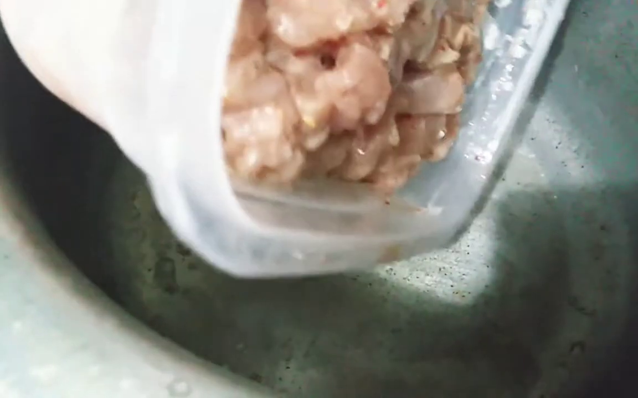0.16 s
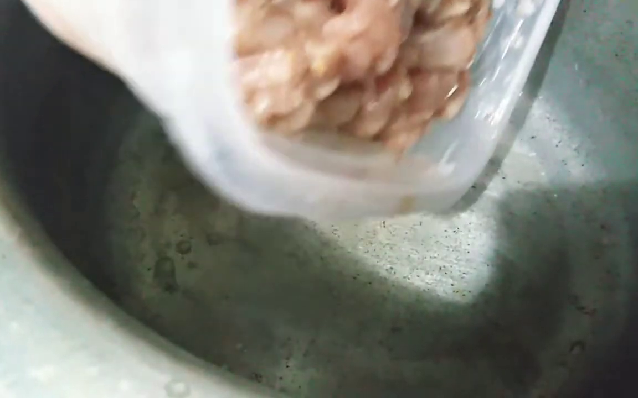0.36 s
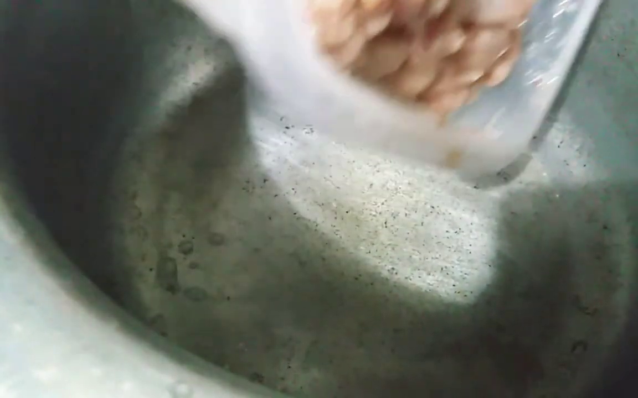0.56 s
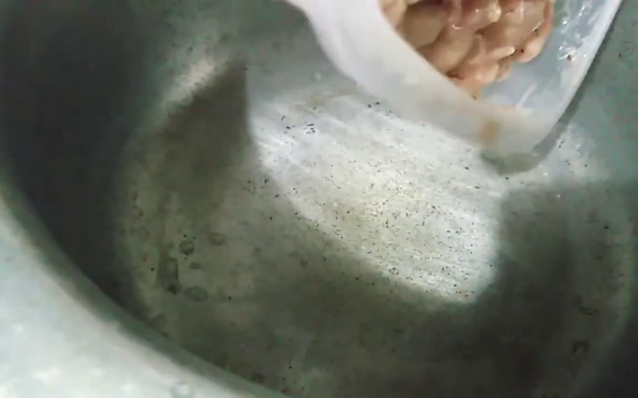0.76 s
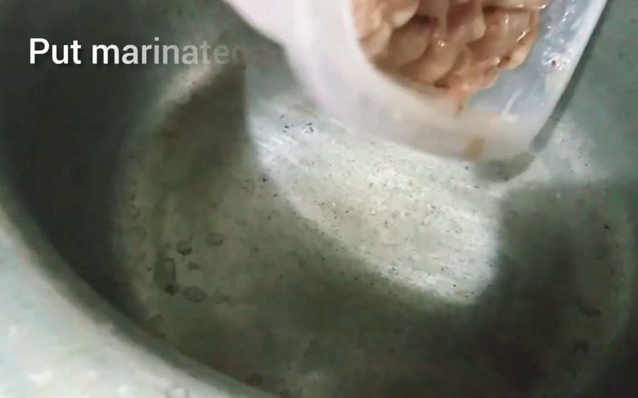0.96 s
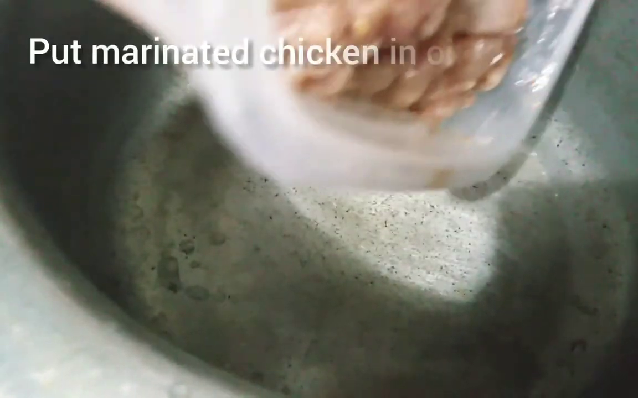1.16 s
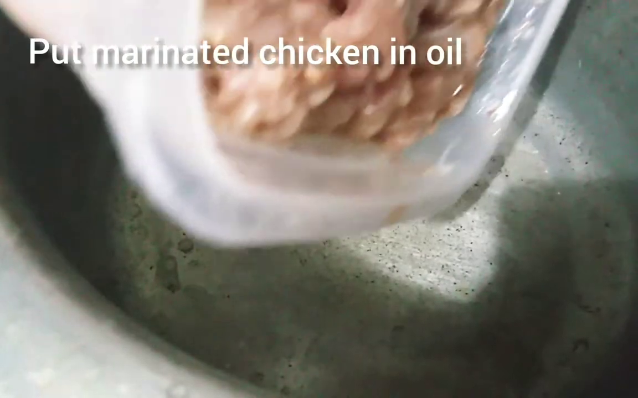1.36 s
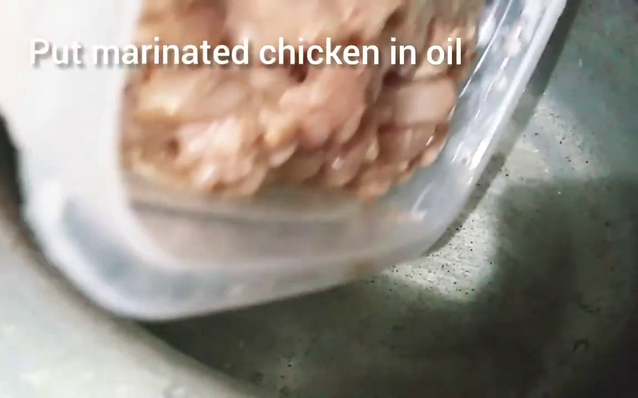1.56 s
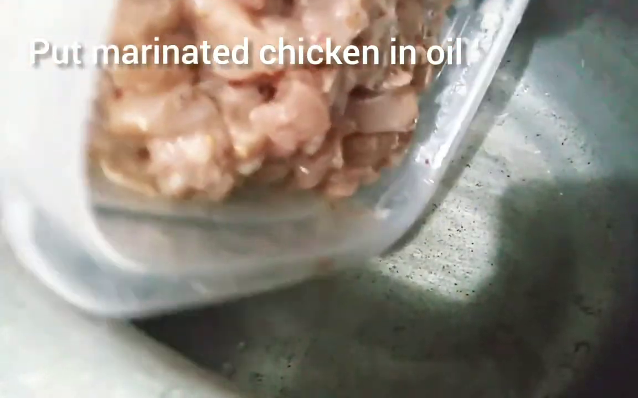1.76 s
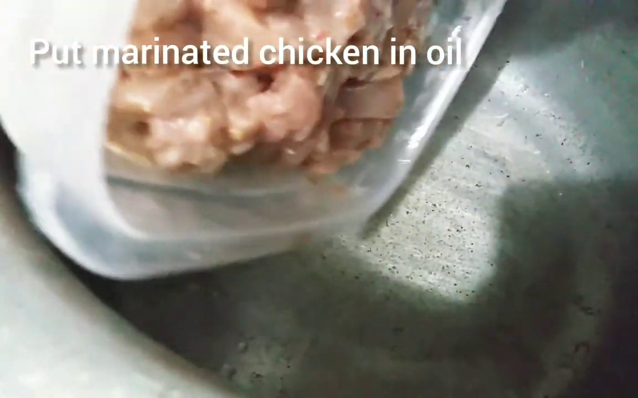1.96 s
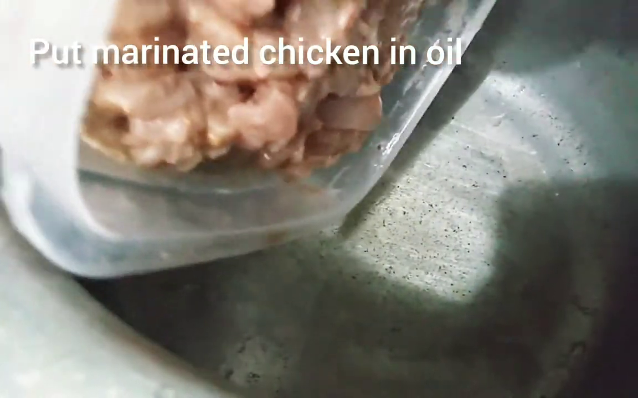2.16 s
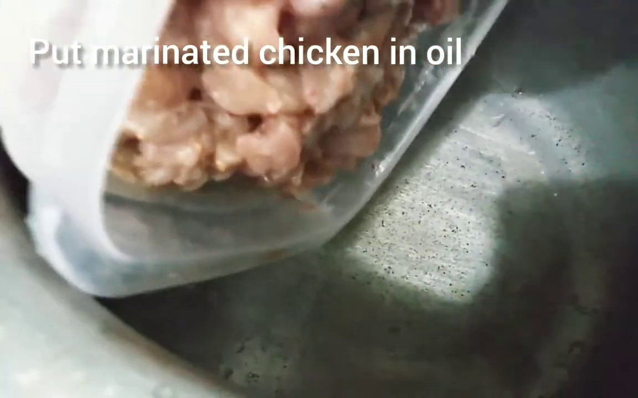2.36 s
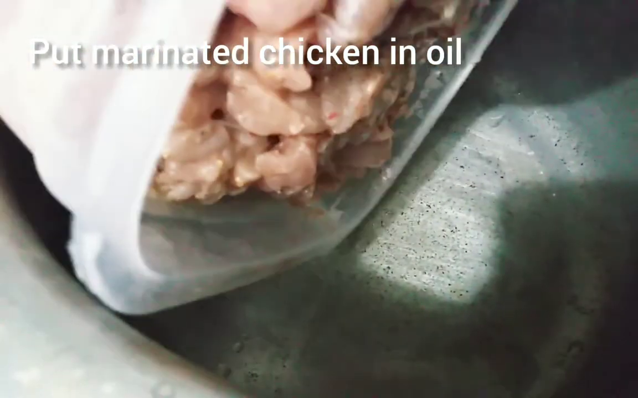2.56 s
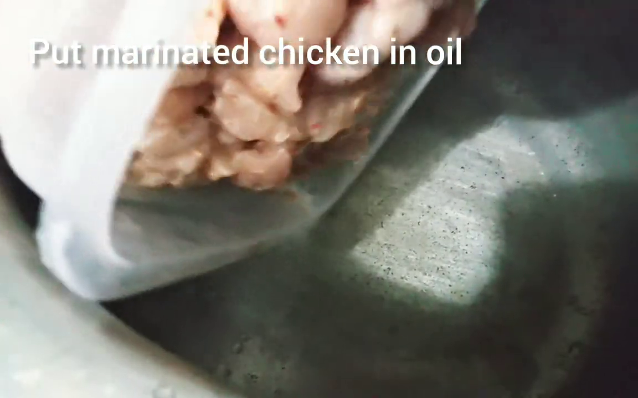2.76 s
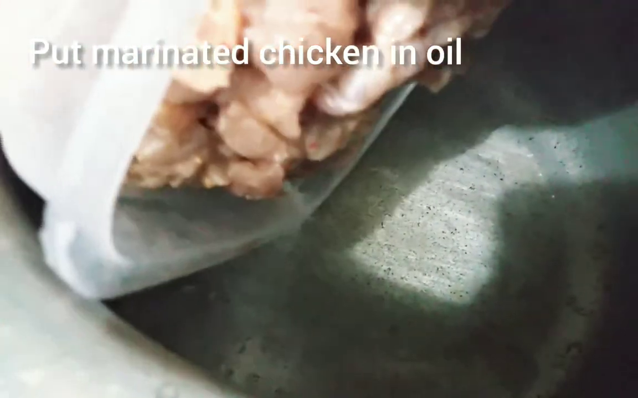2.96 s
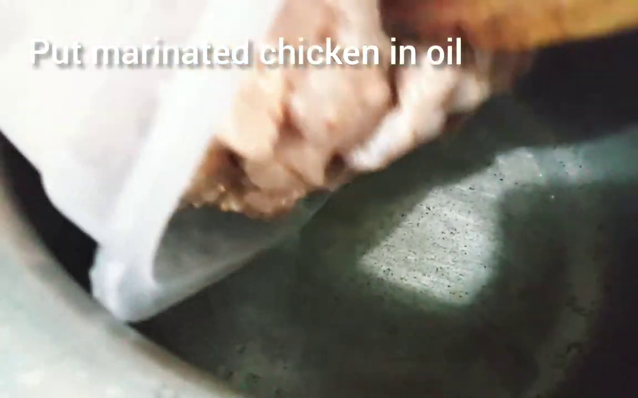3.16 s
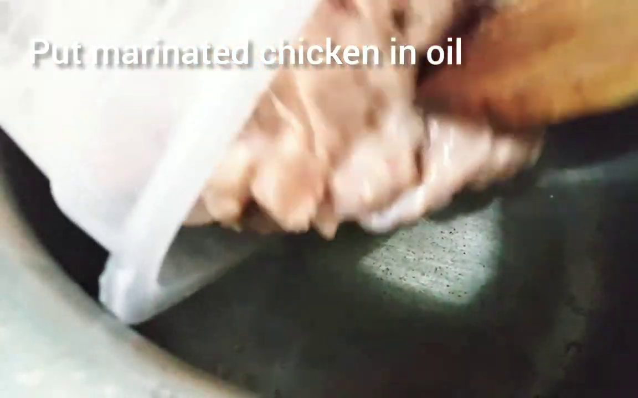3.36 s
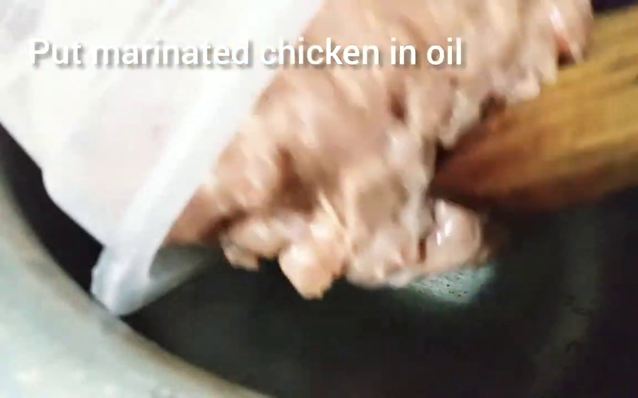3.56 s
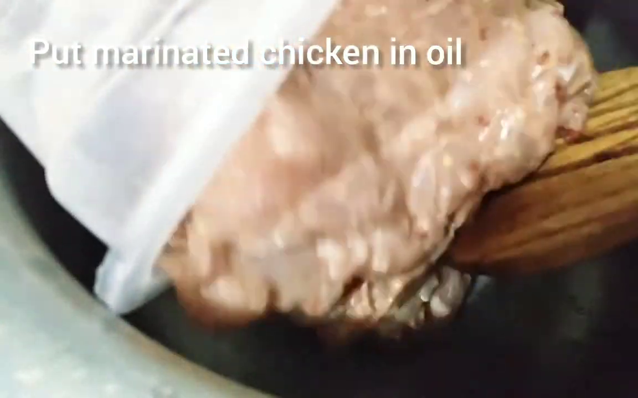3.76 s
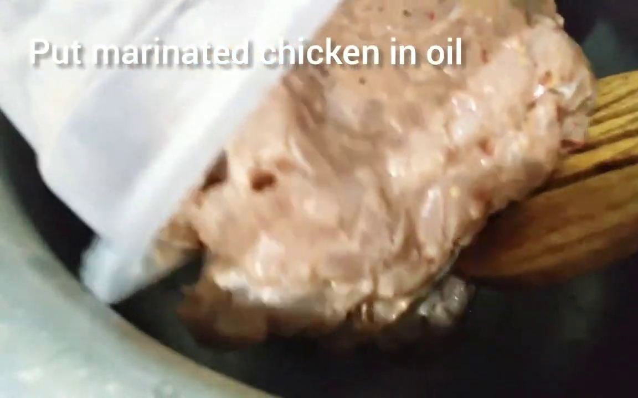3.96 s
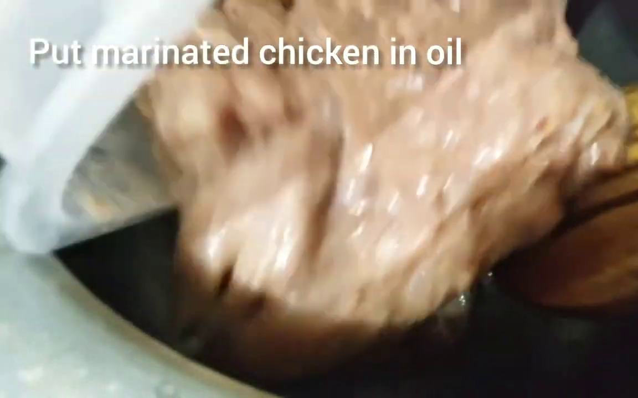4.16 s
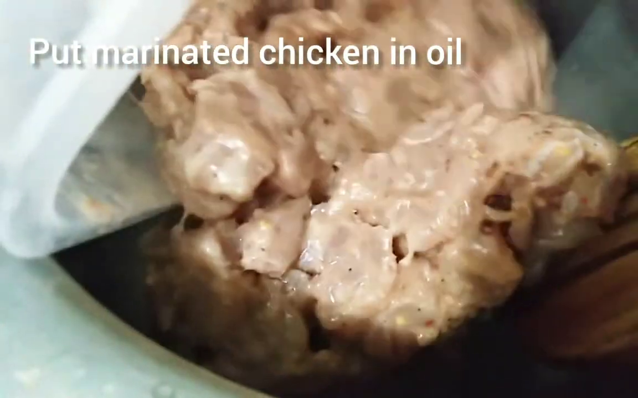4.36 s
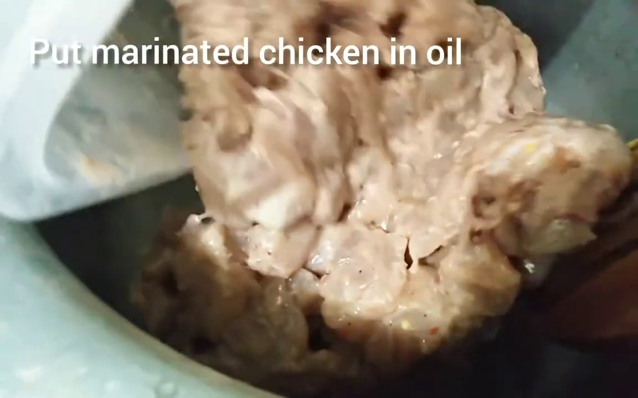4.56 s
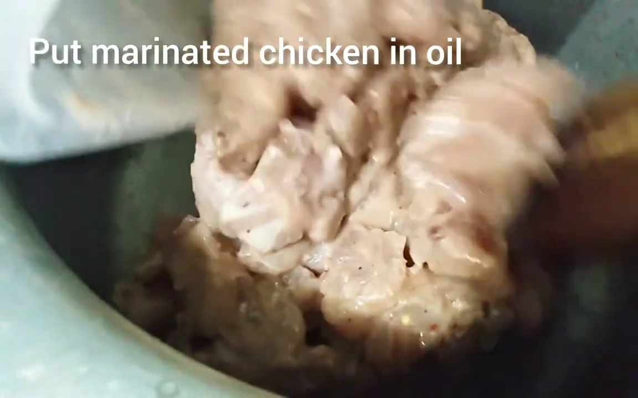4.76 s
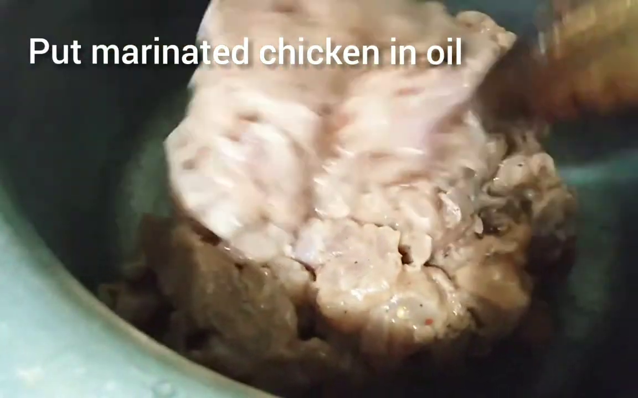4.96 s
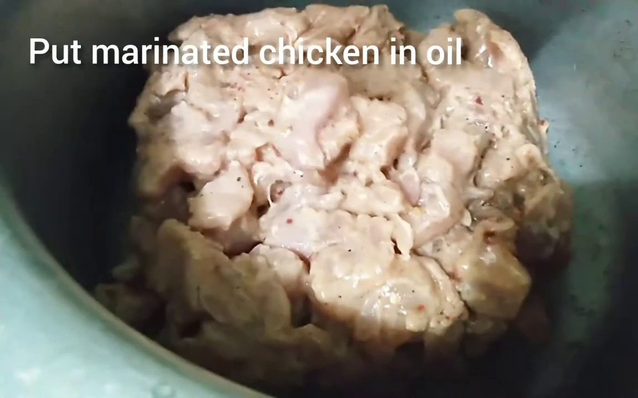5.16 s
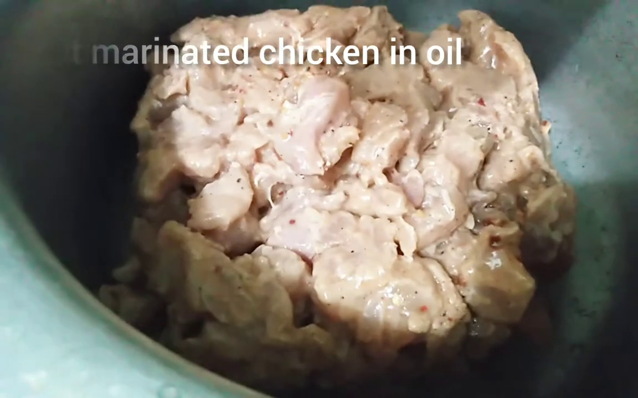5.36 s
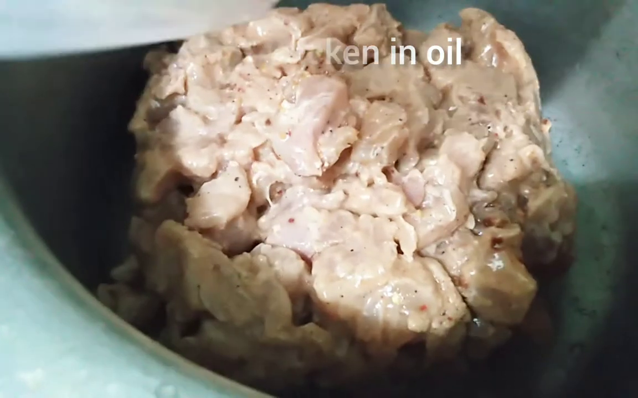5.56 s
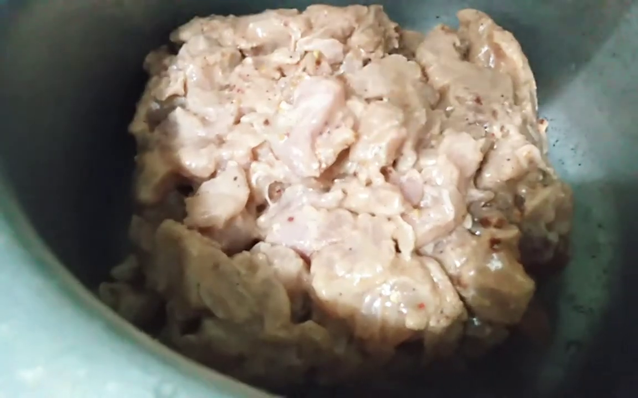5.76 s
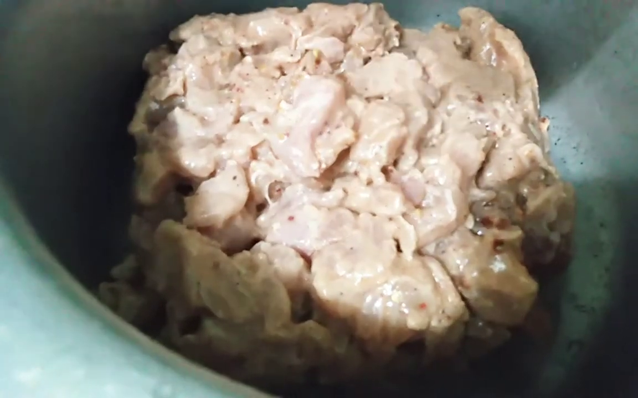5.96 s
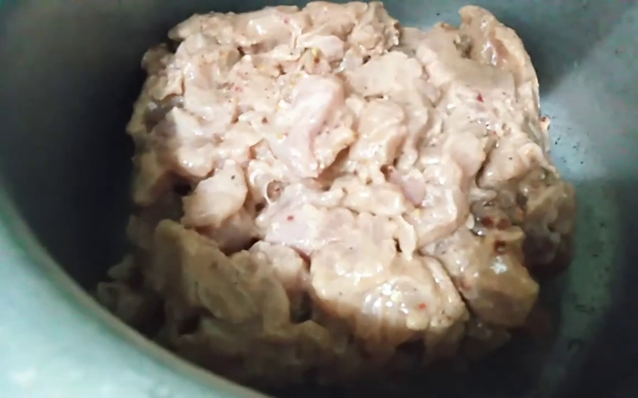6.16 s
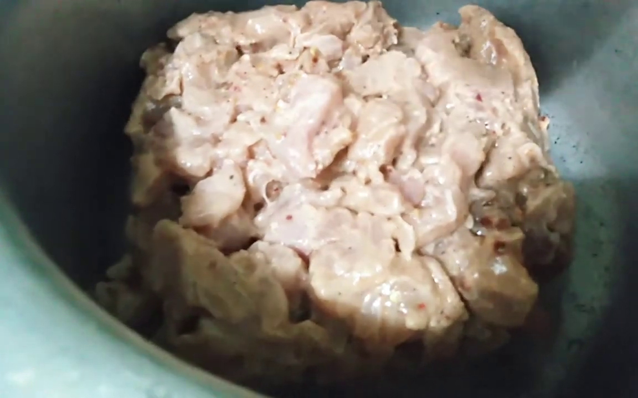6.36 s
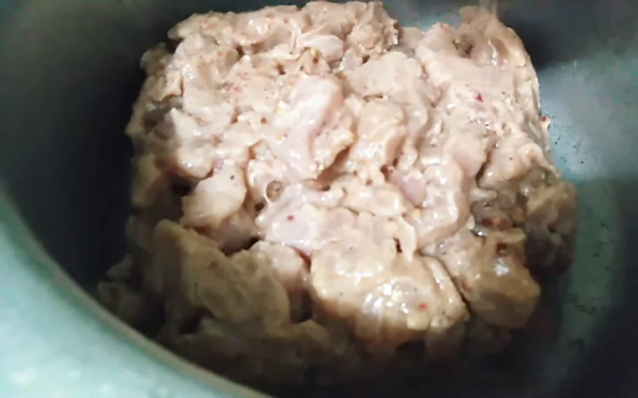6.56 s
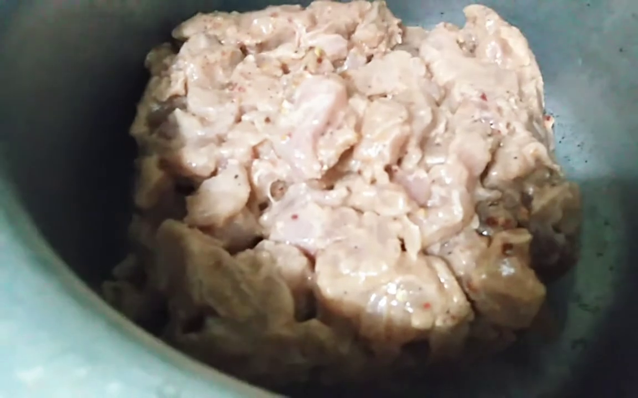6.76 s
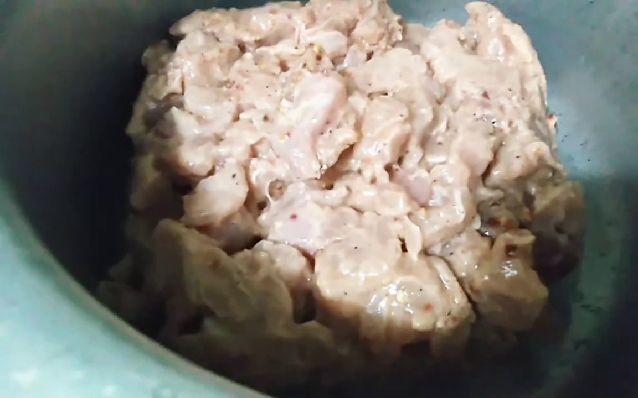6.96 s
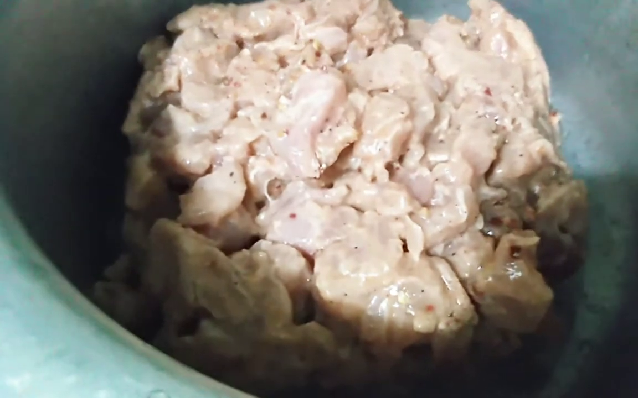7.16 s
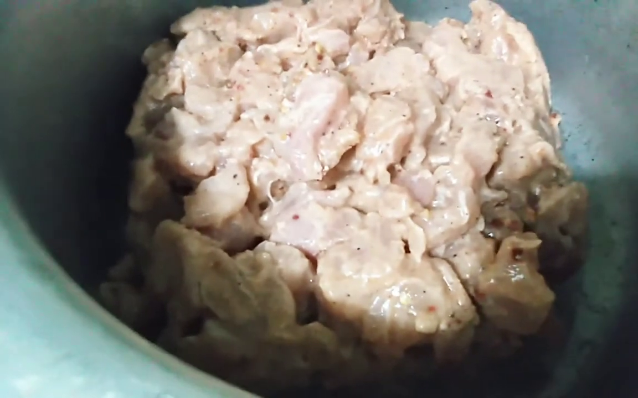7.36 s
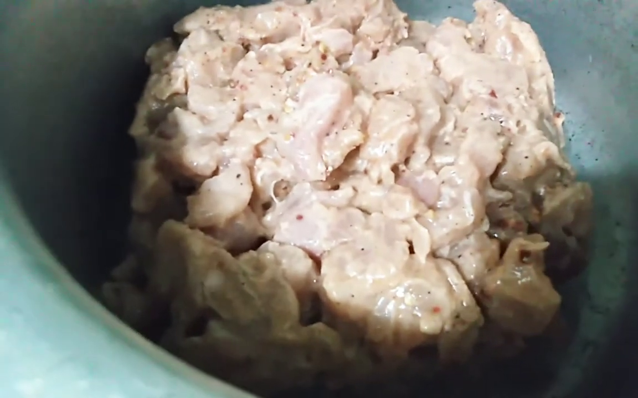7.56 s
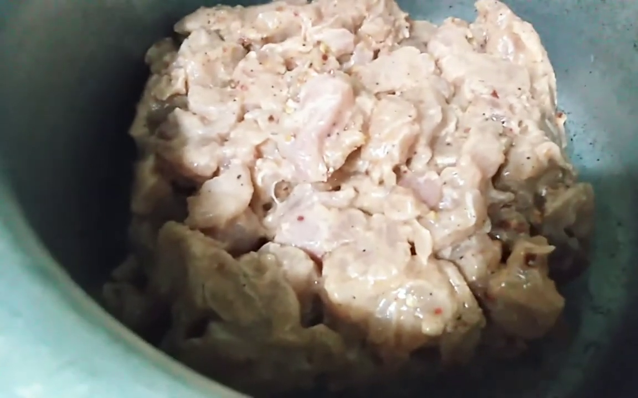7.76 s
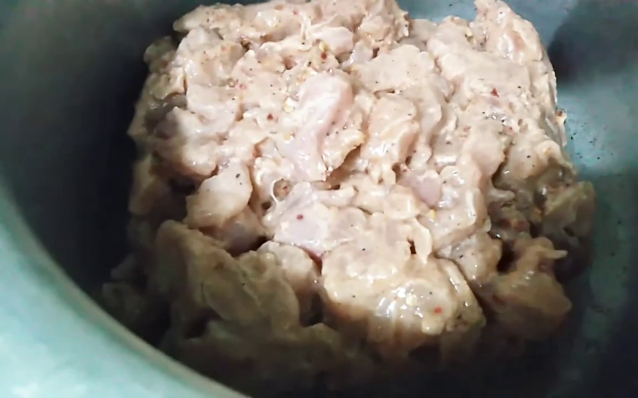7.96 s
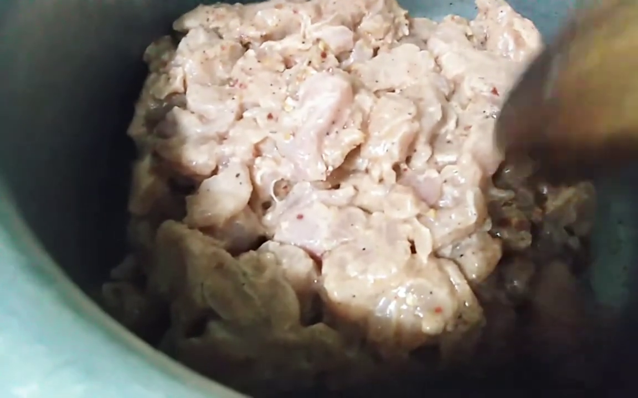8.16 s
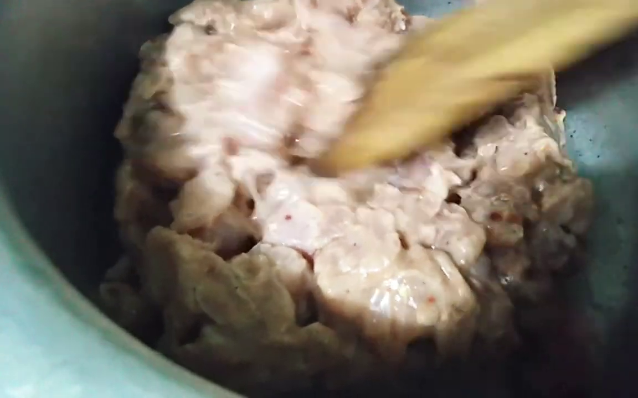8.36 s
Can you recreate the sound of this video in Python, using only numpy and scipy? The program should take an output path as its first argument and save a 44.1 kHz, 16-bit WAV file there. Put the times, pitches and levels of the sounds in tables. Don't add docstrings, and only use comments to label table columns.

```python
import sys
import numpy as np
from scipy import signal
from scipy.fft import rfft, irfft, next_fast_len
from scipy.io import wavfile
from scipy.ndimage import uniform_filter1d, map_coordinates

SR = 44100
rng = np.random.default_rng(int(sys.argv[2]) if len(sys.argv) > 2 else 0)


def digitize_waveform(pressure):
    field = np.atleast_2d(pressure).T
    bounded = np.clip(field, -1, 1)
    quanta = np.round(bounded * 32767).astype(np.int16)
    wavfile.write(sys.argv[1], SR, quanta)


def magnitude_from_level(level_db):
    exponent = np.asarray(level_db, float) / 20
    return 10 ** exponent


N = 374858

# (frequency [Hz], density [dB per Hz])
CRACK_SPECTRUM = [(410, -55), (700, -25), (1590, -1), (1810, -10), (2460, -4), (3260, -13.5), (3520, -13),
                  (7410, -3.5), (15000, -45)]
# (frequency [Hz], density [dB per Hz])
THUD_SPECTRUM = [(60, -36), (150, -0.5), (300, 2.5), (700, 2.5), (1200, -13), (2500, -56)]


def unit(x):
    return x / np.sqrt(np.mean(x ** 2) + 1e-20)


def along(points, hz):
    f, v = np.transpose(points)
    return np.interp(np.log(hz + 1), np.log(f + 1), v)


def curves(rows):
    s, *cols = np.transpose(rows)
    return [np.interp(np.arange(N) / SR, s, c) for c in cols]


def wobble(rate):
    return map_coordinates(rng.standard_normal(int(N * rate / SR) + 4), [np.arange(N) * rate / SR])


def swell(s, rise_s, fall_s):
    late = np.arange(N) / SR - s
    return np.exp(-(late / np.where(late < 0, rise_s, fall_s)) ** 2)


def filtered(x, response):
    m = next_fast_len(x.shape[-1] + 8192)
    return irfft(rfft(x, m) * response(np.fft.rfftfreq(m, 1 / SR)), m)[..., :x.shape[-1]]


def sides(pan_db):
    return magnitude_from_level(np.array([pan_db / 2, -pan_db / 2]))


def rush(spectrum, patchy_db, burst_db=0):
    # (frequency [Hz], coherence)
    likeness = [(60, 0.92), (130, 1), (290, 0.84), (640, 0.95), (1400, 0.0041), (3090, 0.14), (6800, -0.24),
                (15000, -0.06)]
    pops = rng.standard_normal((2, N)) * magnitude_from_level(burst_db * np.array([wobble(900), wobble(900)]))
    z = signal.stft(pops, nperseg=512)[2]
    field = uniform_filter1d(rng.standard_normal(z.shape[1:]), size=3, axis=0)
    field = uniform_filter1d(field, size=10, axis=1)
    pair = signal.istft(z * magnitude_from_level(patchy_db * unit(field)), nperseg=512)[1][:, :N]

    def mid_side(hz):
        turn = np.arccos(np.clip(along(likeness, hz), 0, 1)) / 2
        return magnitude_from_level(along(spectrum, hz)) * [np.cos(turn), np.sin(turn)]

    mid, side = filtered(pair, mid_side)
    return unit(np.array([mid + side, mid - side]))


def add(out, s, x):
    i = round(s * SR)
    out[:, i:i + x.shape[1]] += x[:, :N - i]


def ring(modes, t, scatter_db):
    total = 0
    for hz, db, t60 in modes:
        decay = magnitude_from_level(db + scatter_db * rng.normal() - 60 * t / t60)
        total = total + decay * np.sin(2 * np.pi * hz * t)
    return total


def room(x, wet_db):
    # (frequency [Hz], t60 [s])
    reverberation = [(200, 0.19), (1500, 0.5), (5000, 0.35), (12000, 0.17)]
    hz, t, z = signal.stft(rng.standard_normal((2, SR // 2)), SR, nperseg=256)
    tail = signal.istft(z * magnitude_from_level(-60 * t / along(reverberation, hz)[:, None]), SR, nperseg=256)[1]
    wet = signal.fftconvolve(x, tail / np.linalg.norm(tail[0]), axes=1)
    return magnitude_from_level(wet_db) * wet + np.pad(x, ((0, 0), (0, wet.shape[1] - x.shape[1])))


def kitchen():
    # (frequency [Hz], density [dB per Hz])
    rumble_spectrum = [(24, -71), (40, -16), (131, 0.5), (203, -5.5), (247, -8), (287, -8), (467, -17.5),
                       (535, -30), (586, -25.5), (793, -23), (896, -32), (1410, -40.5), (1500, -43),
                       (1950, -85), (3300, -120)]
    # (frequency [Hz], density [dB per Hz])
    burner_spectrum = [(1470, -76.5), (2500, -36), (3280, -37), (3630, -72), (6380, -31), (6690, -15.5),
                       (7110, -6), (7800, -32), (10000, -54), (13600, -66.5), (22000, -120)]
    # (frequency [Hz], density [dB per Hz])
    rustle_spectrum = [(710, -57), (1200, -17.5), (1610, -21), (2880, -8.5), (4130, -10), (8390, 1),
                       (11200, -12.5), (14200, -19), (15000, -43)]
    # (peak time [s], rise [s], fall [s], peak level [dB])
    rustles = [
        (0.03, 0.054, 0.1, -48),
        (0.78, 0.046, 0.1, -54),
        (1.9, .08, 0.12, -59),
        (2.68, 0.1, 0.3, -53),
        (3.2, 0.061, 0.12, -50),
        (3.5, 0.15, 0.4, -40),
    ]
    # (frequency [Hz], width [Hz],
    # level [dB], steady tone over noise [ratio])
    hum = [(675, 29, -56.5, .3), (1676, 79, -62.5, 0.8), (6920, 250, -57.5, .01)]
    time = np.arange(N) / SR

    nearer_s, nearer_db_per_s = 5.6, 1.55
    rumble_db = -37 + nearer_db_per_s * np.clip(time - nearer_s, 0, None)
    rumble_db = rumble_db + 0.27 * wobble(2.87) + 0.37 * wobble(7.4)
    rumble = magnitude_from_level(rumble_db) * rush(rumble_spectrum, patchy_db=3.0)
    burner_db = -54.5 + wobble(5) + 0.35 * wobble(15)
    burner = magnitude_from_level(burner_db) * rush(burner_spectrum, patchy_db=3.0)

    def narrow(hz, width_hz):
        noise = rng.standard_normal((2, N))
        return unit(filtered(noise, lambda f: 1 / (1 + (2 * (f - hz) / width_hz) ** 4)))

    flare = magnitude_from_level(-56) * swell(1.18, 0.12, 0.12) * narrow(hz=8200, width_hz=1800)
    song = 0
    for hz, width_hz, db, steady in hum:
        tone = np.sin(2 * np.pi * hz * time + 1.8 * wobble(12))
        song = song + magnitude_from_level(db) * unit(narrow(hz, width_hz) + steady * tone)
    moved = magnitude_from_level(-72) + sum(magnitude_from_level(db) * swell(s, rise_s, fall_s) for s, rise_s, fall_s, db in rustles)
    rustle = rush(rustle_spectrum, patchy_db=4, burst_db=6.5)
    return rumble + burner + flare + song + moved * rustle


def ticks():
    # (time [s], peak level [dB], pitch [Hz])
    snaps = [(1.649, -38, 12000), (1.661, -31, 7500), (1.881, -45, 11500), (1.9774, -46, 11500),
             (1.994, -52, 12500), (2.0243, -31.5, 6930), (2.0607, -36.5, 6790), (2.3525, -53, 5300),
             (2.498, -25, 7950), (2.5114, -40, 7750), (2.5418, -25.5, 5700), (2.6389, -35, 8450),
             (2.662, -34, 7190), (2.696, -34.5, 4160), (2.707, -28, 9100), (2.7871, -42, 11500),
             (2.893, -40, 7000), (2.9233, -35, 5300), (3.0802, -20.5, 7400), (3.1156, -43, 2700),
             (3.198, -29, 7940), (3.2226, -38, 5900), (3.245, -25.5, 7150), (3.2604, -33, 6360),
             (3.3408, -46, 4200), (3.3647, -34, 7700), (3.4166, -30.5, 3560), (3.488, -27, 5130),
             (3.5694, -28.5, 3840), (3.5923, -39.5, 2030)]
    left_db, spread_db = 5, 4
    out, t = np.zeros((2, N)), np.arange(SR // 30) / SR
    for s, db, hz in snaps:
        pan_db = left_db + spread_db * rng.normal()
        noise = rng.standard_normal((2, len(t)))
        rough = filtered(noise, lambda f: 1 / (1 + ((f - hz) / (0.15 * hz + 900)) ** 4))
        snap = unit(rough) * magnitude_from_level(-60 * t / 0.015) * (1 - np.exp(-t / 0.0003))
        add(out, s, room(magnitude_from_level(db + 6.5) * snap * sides(pan_db)[:, None], wet_db=-18.5))
    return out


def bumps():
    # (time [s], peak level [dB], lowest mode [Hz], sharpness [dB])
    blows = [(3.754, -30.5, 195, -1), (4.184, -10, 250, -1), (4.688, -12.5, 244, 0),
             (5.59, -11.5, 265, -1.5), (5.668, -6, 263, -8.5), (5.94, -11, 271, -5.5),
             (6.036, -19, 280, 4.5), (6.242, -13, 272, -8.5), (6.288, -15, 283, -2), (6.319, -26, 263, 4),
             (6.591, -21.5, 280, 1.5), (7.671, -15, 257, 2), (7.758, -21, 242, 2),
             (7.915, -22.5, 258, -17.5)]
    # (frequency [Hz], level re sharpness [dB], t60 [s])
    overtones = [(530.4, -7.5, 0.066), (883, -3.5, 0.063)]
    puff_db, click_db = -2, -7
    out, t = np.zeros((2, N)), np.arange(SR // 5) / SR
    for s, db, hz, sharp_db in blows:
        modes = [(c * (1 + 0.035 * rng.normal()), level + sharp_db, t60) for c, level, t60 in overtones]
        modes.append((hz, 0, 0.09))
        puff = unit(filtered(rng.standard_normal(len(t)), lambda f: magnitude_from_level(along(THUD_SPECTRUM, f))))
        puff = puff * magnitude_from_level(puff_db + sharp_db - 60 * t / 0.051)
        dulled = lambda f: magnitude_from_level(along(CRACK_SPECTRUM, f)) / (1 + (f / 3000) ** 4)
        click = unit(filtered(rng.standard_normal(len(t)), dulled))
        click = click * magnitude_from_level(click_db + sharp_db - 60 * t / 0.042)
        blow = (ring(modes, t, scatter_db=0.5) + puff + click) * (1 - np.exp(-t / 0.00035))
        add(out, s, room(magnitude_from_level(db + 6.5) * blow * sides(0.64)[:, None], wet_db=-7.5))
    return out


def pot(t):
    # (frequency [Hz], level [dB], t60 [s])
    pot_modes = [(490, -8, 0.22), (1572, -21, 0.15), (2035, -25, 0.22), (2449, -28, 0.44),
                 (2767, -31, 0.24), (3117, -33, 0.22), (3575, -19, 0.12), (4156, -20, 0.076),
                 (4770, -16, 0.15), (5265, -21, 0.15), (5518, -16, 0.13), (5701, -26, 0.1),
                 (5938, -19, 0.082), (6234, -27, 0.13), (6530, -6, 0.041), (6772, -15, 0.059),
                 (7241, 0, 0.026), (7434, -22, 0.14), (7574, -26, 0.11), (8280, -35, 0.25),
                 (8683, -27, 0.071), (9259, -40, 0.19)]
    damped = [(hz, db, min(t60, 0.19)) for hz, db, t60 in pot_modes]
    return np.array([ring(damped, t, scatter_db=3.5), ring(damped, t, scatter_db=3.5)])


def knocks():
    # (time [s], peak level [dB], thud re peak [dB], hardness [dB], left-right [dB])
    blows = [(0.0513, -14, -10, -24, 0.5), (0.119, -28.5, -13, -12, 7.5), (0.1574, -34, 0.5, -18.5, 9),
             (0.2766, -26, -1.5, -16, 5), (0.611, -16.5, -12.5, -17.5, 0.5),
             (0.6954, -4.5, -10.5, -3.5, 0.5), (1.618, -32, 0.5, -21, 13), (1.6714, -15, -3, -4, 1.5),
             (1.6888, -6, -12, -9, 1.5), (1.728, -9.5, -11, -31, 3), (1.7448, -0.5, -14, -22, 0),
             (2.0825, -28, -1.5, -19, 2), (2.108, -31, -0.5, -18, 9), (2.4875, -14.5, -14.5, -16.5, -2.5),
             (2.822, -27, 0, -29, -2), (2.853, -30.5, 7, -9.5, 3)]
    # (frequency [Hz], level [dB], t60 [s])
    hollow = [(280, 9, 0.016), (483.5, -5.5, 0.21), (699, -4, 0.27), (883, -8.5, 0.024), (1685, -10, 0.22)]
    out, t = np.zeros((2, N)), np.arange(SR // 4) / SR
    for s, db, thud_db, hard_db, pan_db in blows:
        noise = rng.standard_normal((2, len(t)))
        crack = unit(filtered(noise, lambda hz: magnitude_from_level(along(CRACK_SPECTRUM, hz))))
        crack = crack * magnitude_from_level(-60 * t / 0.046) * (1 - np.exp(-t / 0.00067))
        top_hz = 16000 + 330 * hard_db

        def bright(hz):
            shelf = 1 + (magnitude_from_level(hard_db + 9.5) - 1) * 1j * hz / (4200 + 1j * hz)
            return shelf / (1 + (hz / top_hz) ** 6)

        ring_db = 3 + 0.97 * hard_db
        top = filtered(crack + magnitude_from_level(ring_db) * pot(t), bright)
        puff = unit(filtered(rng.standard_normal(len(t)), lambda hz: magnitude_from_level(along(THUD_SPECTRUM, hz))))
        puff = puff * magnitude_from_level(4.5 - 60 * t / 0.09)
        thud = magnitude_from_level(thud_db - 4.5) * (ring(hollow, t, scatter_db=2.5) + puff)
        add(out, s, room(magnitude_from_level(db - 3) * (top * sides(pan_db)[:, None] + thud), wet_db=-9.5))
    return out


def frying():
    # (time [s], vigour [dB])
    vigour = [(3.635, -45), (3.655, -35.5), (3.68, -15.5), (3.8, -9), (4.05, -7), (4.45, -4.5), (5.2, -4.5),
              (5.9, -9), (6.3, -9), (7.1, -12.5), (7.6, -13), (8.1, -14.5), (8.2, -13.5), (8.5, -12.5)]
    # (frequency [Hz], density [dB per Hz])
    fizz_spectrum = [(1470, -53), (2500, -14), (2820, -19.5), (3020, -9.5), (3310, -20), (3600, -11.5),
                     (4100, -13), (6180, -1.5), (7480, 4.5), (8380, -3.5), (12900, -15.5), (14800, -31),
                     (15900, -50)]
    # (frequency [Hz], density [dB per Hz])
    boil_spectrum = [(180, -28), (300, -6.5), (344, -24), (431, -9), (517, -5), (634, -4), (975, -9),
                     (1070, -5), (1370, -5), (1900, -2), (2580, -1.5), (2800, -5), (4500, -3), (5850, -25),
                     (9900, -120)]
    # (frequency [Hz], width [Hz], gain [dB])
    wall_modes = [(546, 30, 9), (1060, 22, 9), (1590, 32, 6.5), (1950, 99, 4), (2160, 92, -2.5),
                  (2970, 105, 1.5), (3330, 100, -1.5), (4000, 170, -2)]
    # (frequency [Hz], left-right [dB])
    lean = [(60, 15.5), (110, -2), (200, 6), (380, 1), (700, 2.5), (1290, -0.5), (2380, 3), (4390, 11),
            (8100, 0), (15000, 11.5)]

    fizz_db, = curves(vigour)
    time = np.arange(N) / SR
    since = np.clip(time - vigour[0][0], 0, None)
    cooling = np.clip((time - 5) / 3, 0, 1)
    surge = (0.128 + 0.19 * cooling) * (wobble(16) + 4.8 * np.array([wobble(40), wobble(40)]))
    unequal_db = 2.2 + 2.2 * cooling
    fizz = magnitude_from_level(1.5 + surge) * rush(fizz_spectrum, patchy_db=1.5, burst_db=unequal_db)
    finest = filtered(fizz, lambda hz: 1 / (1 + (13200 / (hz + 1)) ** 12))
    fizz = fizz + (magnitude_from_level(1.1 * (fizz_db + 8.5)) - 1) * finest

    boil = magnitude_from_level(-8.5 + 0.27 * surge) * rush(boil_spectrum, patchy_db=2.5, burst_db=-1.0)
    deep = filtered(boil, lambda hz: 1 / (1 + (hz / 1100) ** 4))
    deep_db = 1.5 - 9.5 * np.exp(-(since / 0.54) ** 2)
    boil = boil + (magnitude_from_level(deep_db) - 1) * deep

    walls = lambda hz: magnitude_from_level(sum(db / (1 + (2 * (hz - c) / w) ** 2) for c, w, db in wall_modes))
    left, right = filtered(fizz + boil, lambda hz: walls(hz) * sides(along(lean, hz) * 0.74))
    direct, port_lag_s = 0.3, 10 / 44100
    delayed = filtered(right, lambda hz: np.exp(-2j * np.pi * hz * port_lag_s))
    left = np.sqrt(1 - direct ** 2) * left + direct * delayed

    slump_db = -3.6 / (1 + np.exp((6.85 - time) / 0.15))
    pan_db = -0.6 - 0.6 * since + slump_db
    landed = np.clip(since / 0.01, 0, 1)
    return landed * magnitude_from_level(fizz_db) * sides(pan_db) * np.array([left, right])


def scene():
    return kitchen() + ticks() + bumps() + knocks() + frying()


def roll_off(x):
    return signal.sosfilt(signal.butter(12, 15550, fs=SR, output="sos"), x)


def record(dry):
    heard = filtered(dry, lambda hz: (1j * hz / (60 + 1j * hz)) ** 2)
    clipped = heard / (1 + np.abs(heard / 0.74) ** 8) ** (1 / 8)
    return roll_off(clipped)


dry = scene()
out = record(dry)
digitize_waveform(out)
```